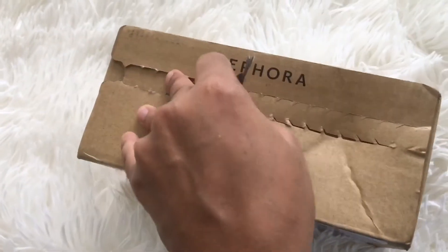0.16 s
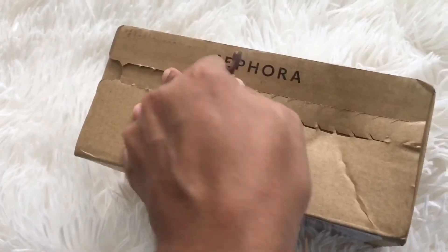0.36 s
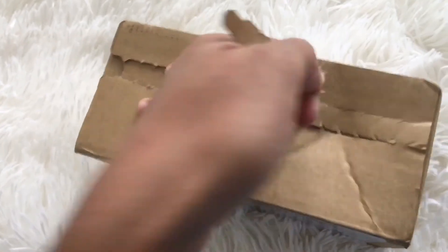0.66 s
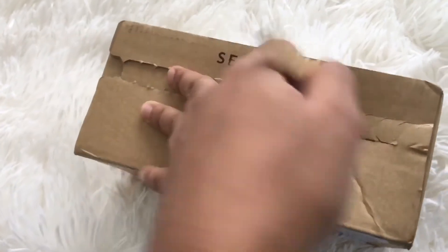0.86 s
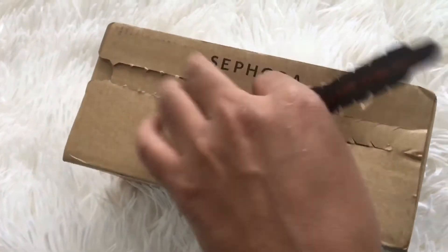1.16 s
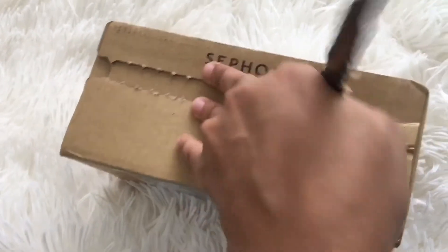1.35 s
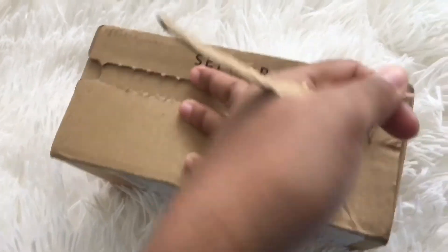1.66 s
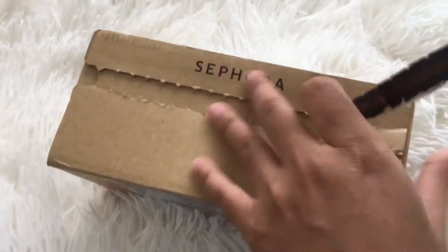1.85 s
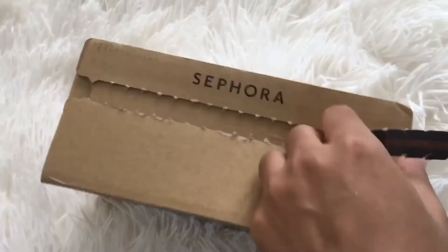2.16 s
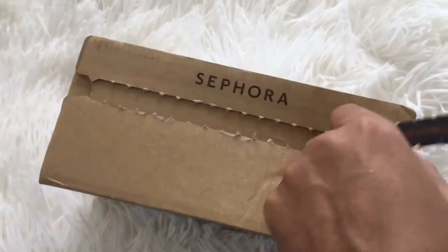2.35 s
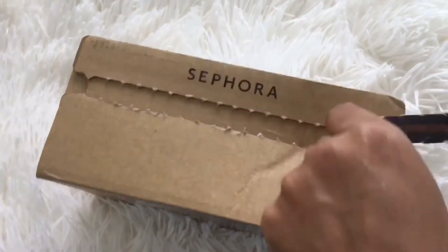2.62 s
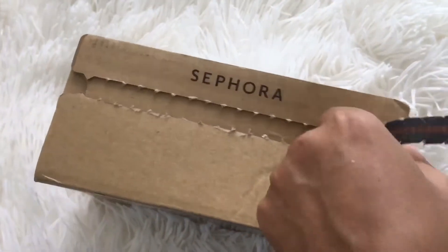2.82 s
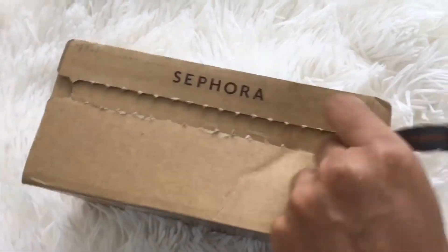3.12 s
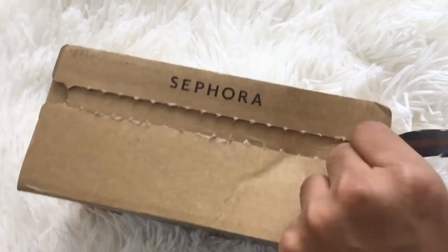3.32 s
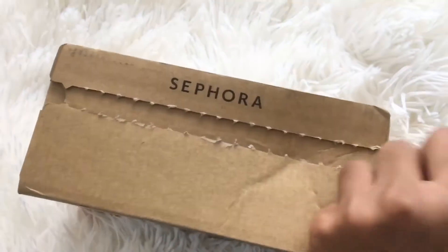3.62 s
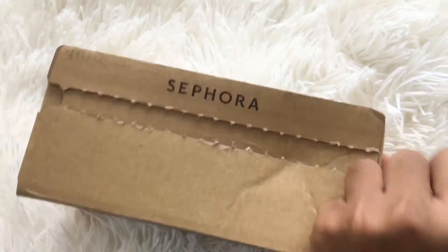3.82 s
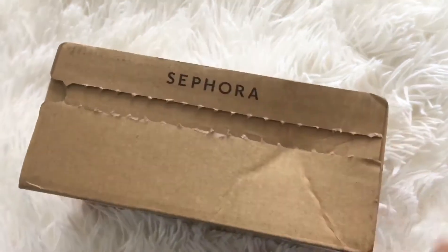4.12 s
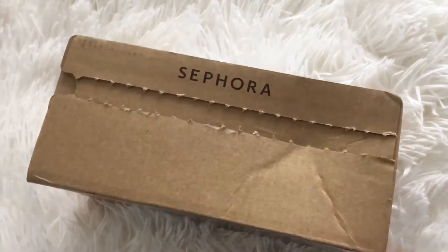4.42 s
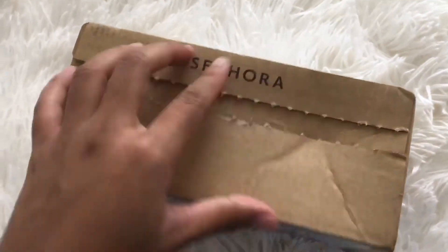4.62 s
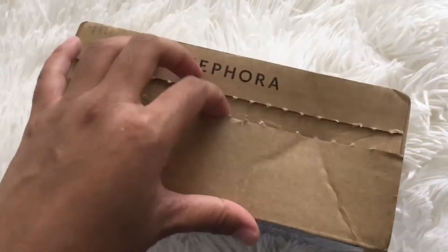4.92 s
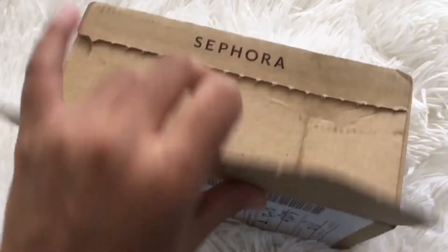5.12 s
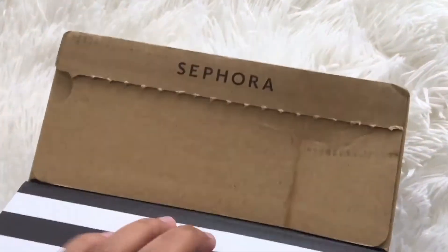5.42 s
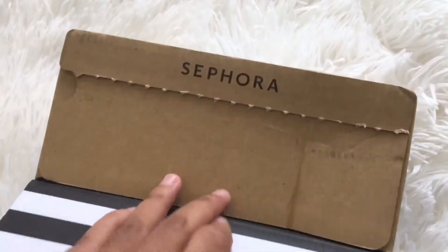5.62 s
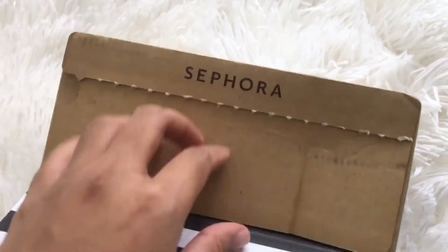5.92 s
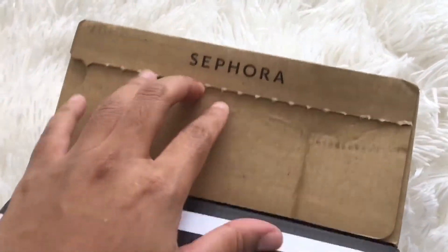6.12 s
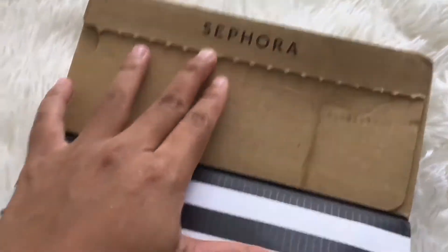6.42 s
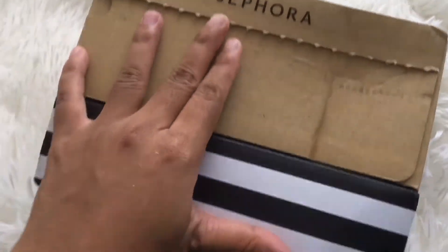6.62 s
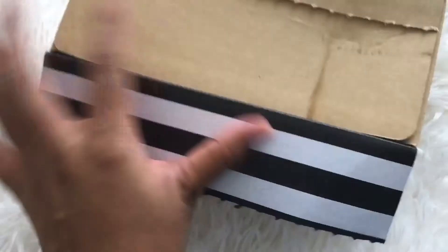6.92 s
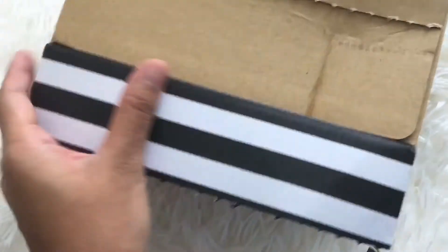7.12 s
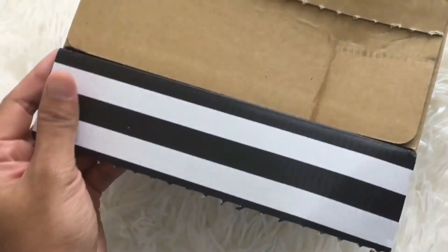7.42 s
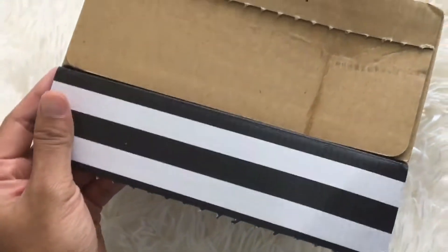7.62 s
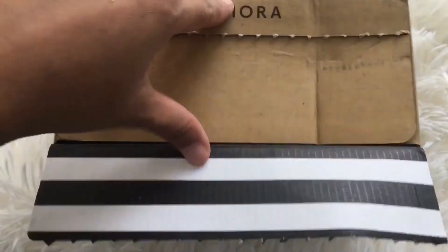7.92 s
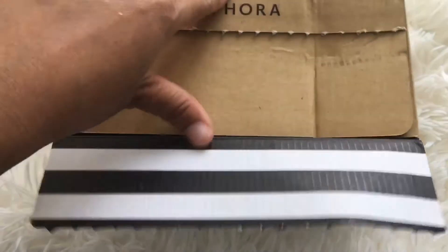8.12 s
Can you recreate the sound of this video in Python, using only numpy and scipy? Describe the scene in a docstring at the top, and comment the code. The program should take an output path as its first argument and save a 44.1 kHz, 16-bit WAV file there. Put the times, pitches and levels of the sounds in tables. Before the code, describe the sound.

A quiet furnished room with low air noise and a faint steady hum; a hollow corrugated box is very close to the microphone. Soft sawing rubs begin at 0.1 s, then from 0.27 to 0.57 s a loud, dense rip crackles with rapid boxy snaps and thumps, the loudest moment. Light brushes, ticks and a dull bump follow until 1.1 s. Sharp snaps tear at 1.2 to 1.46 s, then skin slides and taps softly. Short rasps resume at 2.4 s, with snapping tears near 2.8, 3.3 and 3.74 s. It nearly hushes from 4 to 4.5 s. The lid scrapes in dry chattering bursts from 4.65 to 5.1 s and 5.5 to 6.3 s, with small bumps. Airy, low palm sliding runs from 6.6 to 7.2 s, then faint handling. At 8.0 to 8.1 s the crease gives weak muffled cracks, followed by brief scrapes.

```python
"""In a quiet room with a faint appliance hum, hands shift on a corrugated cardboard box on a thick rug.
A knife saws through its glued flap, close by: rubbing is filtered random grains, ripping a dense crackle.
Fibres fray and snap: jolts of force ring panel resonances and thump the hollow box; bumps and ticks follow.
Then hands slide over the card and lift the lid, whose scraping edge chatters in bursts of ringing catches.
Folded back, the lid cracks at its crease, rung like the snaps but through its own resonances."""
import sys
import numpy as np
from scipy import signal
from scipy.fft import rfft, irfft, next_fast_len
from scipy.io import wavfile
from scipy.ndimage import uniform_filter1d

SR = 44100
rng = np.random.default_rng(int(sys.argv[2]) if len(sys.argv) > 2 else 0)


def to_wav(s):
    """Save 16-bit WAV."""
    ch = np.atleast_2d(s).T  # columns
    pcm = np.round(np.clip(ch, -1, 1) * 32767)  # PCM
    wavfile.write(sys.argv[1], SR, pcm.astype(np.int16))


N = 364266
TIME = np.arange(N) / SR   # s

# still air of the room: (frequency [Hz], relative level per Hz [dB])
AIR_SPECTRUM = [(22, -25), (32, -15.5), (45, 4), (65, 8), (90, -0.5), (130, -5.5), (185, -1.5), (280, -10),
                (500, -19.5), (1300, -23), (2500, -29.5), (5000, -55.5), (6800, -42), (16000, -65.5)]
AIR_DB = -52   # rms level
# humming lines of an appliance: (frequency [Hz], pitch waver [Hz], level [dB])
HUM_LINES = [(190, 5.6, -65.5), (368, 6, -75), (1853, 5.98, -72)]

# faint shifting of the holding hands, underneath everything: (time [s], relative rasp level [dB])
GRIP_LEVELS = [(0, -66), (0.9, -64), (2.1, -63.5), (2.35, -65), (3.1, -62), (3.65, -69.5), (3.95, -63),
               (4.35, -71.5), (4.6, -62), (5.2, -60.5), (6.45, -64), (7.55, -68.5), (7.7, -65),
               (8.25, -60.5)]
GRIP_DRONE_DB, GRIP_HISS_DB = 3, -4   # above the rasp
# colour of sliding friction: (frequency [Hz], relative level per Hz [dB])
FRICTION_SPECTRUM = [(130, 6), (220, -6.5), (330, 7), (540, 3), (690, 3), (900, -0.5), (1270, 0.5),
                     (1900, 0.5), (2600, -1.5), (3600, -10), (5000, -15), (6800, -12.5), (10500, -13.5),
                     (16000, -10)]
# the blade slides along the seam:
# (start time [s], length [s], relative rasp level [dB], brightness [dB])
BLADE_STROKES = [(0.12, 0.073, -58, -0.5), (0.185, 0.05, -54.5, 2), (0.3, 0.23, -50, 5),
                 (0.66, 0.063, -57.5, 5.5), (1.13, 0.18, -59.5, 11), (1.31, 0.18, -51, 4.5),
                 (2.435, 0.05, -57, 0), (2.55, 0.096, -61, -7), (2.77, 0.087, -50, -0.5),
                 (2.95, 0.053, -58, 1), (3.065, 0.045, -54.5, -1), (3.225, 0.055, -48, -1.5),
                 (3.29, 0.12, -52, -0.5), (3.485, 0.061, -54.5, 1.5), (3.695, 0.074, -49.5, -2),
                 (3.77, 0.15, -61, 0.5)]
# skin brushes over the card:
# (start time [s], length [s], relative rasp level [dB], brightness [dB])
SKIN_BRUSHES = [(0.735, 0.026, -57, 9), (0.825, 0.027, -67, 12), (0.955, 0.026, -52.5, -3),
                (1.6, 0.05, -57, 8), (1.67, 0.18, -57.5, 0.5), (1.96, 0.062, -63, -4.5),
                (2.955, 0.016, -58.5, 2), (3.09, 0.015, -54.5, 4.5), (4.03, 0.08, -67.5, 3.5),
                (5.325, 0.046, -58.5, 2.5), (5.395, 0.08, -51, 0), (5.96, 0.045, -57.5, 1),
                (6.205, 0.05, -64, 3), (6.615, 0.061, -54.5, -2.5), (6.70, 0.1, -52.5, -5),
                (6.76, 0.12, -58, 1.5), (6.91, 0.24, -54, -3.5), (7.06, 0.037, -50, -5.5),
                (7.16, 0.099, -65, 0), (7.84, 0.095, -59, 0)]
# the lid scrapes against the box:
# (start time [s], length [s], relative rasp level [dB], brightness [dB], chatter pitch [Hz])
LID_SCRAPES = [(4.647, 0.12, -57, 12, 1400), (4.765, 0.042, -44.5, -2, 1250),
               (4.824, 0.12, -53.5, 1.5, 1290), (4.896, 0.051, -54.5, 4, 1330),
               (5.015, 0.031, -48, -1, 1190), (5.073, 0.028, -59, 1, 3770), (5.51, 0.076, -47, 3.5, 3300),
               (5.673, 0.098, -51.5, 0, 1300), (5.74, 0.073, -48, 0.5, 1660),
               (5.825, 0.061, -47.5, 2, 2080), (6.057, 0.068, -51.5, 1, 2770), (6.14, 0.1, -56.5, -8, 480),
               (6.294, 0.054, -59, -8, 900), (8.133, 0.047, -56, 1.5, 1180),
               (8.23, 0.056, -53.5, 5.5, 2300)]
# a longer stroke gathers speed and dies away more slowly: shares of its length
STROKE_SWELL, STROKE_FADE = 0.14, 0.21

# runs of the blade ripping fibres:
# (start time [s], length [s], relative starting level [dB], rise over the run [dB])
RIP_RUNS = [(0.252, 0.065, -53.5, 8), (0.306, 0.016, -41.5, 14.5), (0.401, 0.039, -45.5, 23.5),
            (0.434, 0.015, -35.5, -12), (0.446, 0.036, -26.5, -10), (0.492, 0.018, -41, 10),
            (0.509, 0.023, -39.5, 5), (1.175, 0.055, -57.5, 7), (1.209, 0.018, -49, 14),
            (1.323, 0.023, -43.5, 18), (1.442, 0.039, -30.5, -20), (2.757, 0.026, -58.5, 28.5),
            (2.794, 0.016, -36, -3), (2.81, 0.05, -51.5, 0), (3.267, 0.011, -42, 6), (3.305, 0.014, -48, 9),
            (3.707, 0.045, -47, -9)]
RIP_BITE_S = 0.0051   # the blade takes this long to bite

# the glued flap snaps under the blade:
# (time [s], thump level [dB], panel pitch [Hz], knock level [dB], crack level [dB],
#  rebound strength [dB])
FLAP_SNAPS = [(0.266, -44, 390, -35, -43.5, -11), (0.3039, -27.5, 405, -40, -42, -15),
              (0.3252, -14, 354, -14, -23, -9.5), (0.3937, -44, 517, -41, -41.5, -14),
              (0.4069, -26.5, 530, -33, -42, -19.5), (0.4155, -35, 320, -29, -27, -16),
              (0.4301, -21, 293, -16.5, -24, 0.5), (0.439, -19.5, 437, -27.5, -29, -20),
              (0.455, -21.5, 426, -14, -24, -0.5), (0.5006, -20, 345, -16, -24, 2),
              (0.5284, -31.5, 430, -34.5, -39, -15), (0.547, -20.5, 484, -23.5, -19, -24),
              (0.565, -35.5, 510, -44.5, -34, -6.5), (1.214, -23, 334, -15, -22.5, -20),
              (1.2529, -23.5, 410, -26.5, -33, -23), (1.345, -33, 580, -26, -23, 6),
              (1.4353, -22.5, 490, -28, -21, -28.5), (1.4422, -28.5, 420, -30.5, -24, -30),
              (1.458, -28, 506, -27.5, -24, 0.5), (2.7865, -24.5, 307, -17, -22, -18),
              (2.7937, -16.5, 151, -30, -30, -6.5), (2.8039, -22, 460, -24.5, -33.5, -32),
              (2.8385, -44, 200, -41, -36.5, 0), (3.3245, -25, 210, -36, -32.5, -7),
              (3.3706, -21.5, 393, -22.5, -32.5, 1.5), (3.74, -25, 175.5, -35.5, -33.5, -9)]
SNAP_FRAY_MS, CREASE_FRAY_MS = 1.34, 2.9   # fibres fray before they break
# the freed panel swings back: a second jolt, lower in pitch, each part shifted by its own amount
REBOUND_S, REBOUND_PITCH = .0036, .8
REBOUND_THUMP_DB, REBOUND_KNOCK_DB, REBOUND_CRACK_DB = 0.5, -10, -6.5
# resonances of the box, from hollow to liner: (frequency [Hz], width [Hz], relative level [dB])
BOX_MODES = [(101, 29, 3), (171, 120, 1.5), (260, 34, -16.5), (371.6, 64, 2.5), (490, 79, 0.5),
             (630, 67, -2.5), (1194, 364, 4.5), (1545, 250, -10.5), (2263, 280, -13), (3240, 610, -12.5),
             (5470, 330, -13), (6440, 530, -16), (8520, 1400, -15), (11640, 470, -15), (15000, 8900, -23.5)]
SPOT_SPREAD_DB = 2.5   # how much the strength of a resonance differs from spot to spot
PANEL_Q = 2.5          # a flexing panel springs back for only a cycle or two
LEVEL_SPAN = np.sqrt(.005 * SR)   # levels of snaps, bumps and ticks are rms over 5 ms

# a torn edge catches and flicks free: (time [s], level [dB], ring pitch [Hz])
EDGE_TICKS = [(0.691, -51.5, 2350), (1.07, -60.5, 8260), (1.176, -53, 4350), (2.273, -64, 14000),
              (2.303, -56, 9000), (2.325, -53, 7450), (2.566, -57.5, 9100), (3.113, -71, 6140),
              (3.886, -58, 3970), (3.961, -49, 2250), (4.911, -46.5, 1450), (5.528, -49.5, 3470),
              (5.614, -44.5, 1570), (6.606, -48, 2270), (7.862, -51, 2250)]

# hand and knife handle bump the box:
# (time [s], thump level [dB], panel pitch [Hz], hardness: knock above thump [dB])
BOX_BUMPS = [(0.79, -43, 516, -17), (0.893, -33.5, 387, -9.5), (1.08, -46, 190, -11),
             (1.671, -40.5, 376, -13), (1.83, -38, 320, -8.5), (1.999, -38.5, 189, -8.5),
             (3.054, -42, 500, -9.5), (3.832, -40.5, 249, -10.5), (4.523, -43.5, 222, -8.5),
             (4.532, -41.5, 292, -8), (4.703, -32, 318, -7), (5.462, -36, 186, -19), (5.774, -54, 219, -7),
             (5.896, -37.5, 358, -7), (6.108, -43, 340, 0), (7.677, -44.5, 178, -10)]
BUMP_CRACK_DB, BUMP_CONTACT_MS = -7, 2   # crack above the knock; time a soft contact takes

# above the rasp; catches per second; sharpness of the ring
CHATTER_DB, CHATTER_PER_S, CHATTER_Q = -5, 700, 3.5

# the crease of the lid gives as it is folded back:
# (time [s], thump level [dB], panel pitch [Hz], knock level [dB], crack level [dB],
#  rebound strength [dB])
CREASE_CRACKS = [(8.0054, -39, 210, -34, -46, -11), (8.0165, -32.5, 222, -32, -46.5, -21),
                 (8.035, -32.5, 226, -37, -55, -16), (8.0875, -32.5, 312, -31, -45, 4.5)]
# resonances of the free-standing lid: (frequency [Hz], width [Hz], relative level [dB])
LID_MODES = [(222, 47, -7.5), (810, 66, -13.5), (1250, 126, 1), (1900, 270, -16), (2400, 320, -14),
             (3600, 430, -2.5), (4340, 700, -12), (5770, 600, -1), (8600, 730, -20)]

# the room's ring: (band centre [Hz], time to fall by 60 dB [s])
ROOM_DECAY = [(100, 0.55), (400, 0.16), (1200, 0.35), (3000, 0.29), (8000, 0.19), (16000, 0.13)]
# colour of the room's reflections: (frequency [Hz], relative level [dB])
ROOM_SPECTRUM = [(100, -16), (400, -12), (1200, -17.5), (3000, -18), (8000, -18.5), (16000, -12.5)]
CUTOFF_HZ = 15900


def from_db(db):
    """Turns dB into an amplitude factor."""
    return 10 ** (np.asarray(db) / 20)


def rms_one(x):
    """Scales a signal to rms 1."""
    return x / np.sqrt(np.mean(x ** 2) + 1e-20)


def unit_energy(rows):
    """Scales each row to energy 1."""
    return rows / (np.linalg.norm(rows, axis=-1, keepdims=True) + 1e-12)


def at_hz(points, hz):
    """Reads a table over log frequency."""
    known_hz, values = np.transpose(points)
    return np.interp(np.log(np.maximum(hz, 1)), np.log(known_hz), values)


def coloured(x, spectrum):
    """Filters a signal with a spectrum; rms 1."""
    size = next_fast_len(N)
    gain = from_db(at_hz(spectrum, np.fft.rfftfreq(size, 1 / SR)))
    return rms_one(irfft(rfft(x, size) * gain, size)[:N])


def add(out, sound, start):
    """Mixes a sound in from a sample on."""
    part = out[start:start + len(sound)]
    part += sound[:len(part)]


def drift(rate):
    """Smooth chance with rate turning points per second; rms 1."""
    steps = TIME * rate
    return rms_one(np.interp(steps, np.arange(N // 10), rng.standard_normal(N // 10)))


def butter(x, order, edge_hz, kind="low"):
    """Butterworth filter."""
    return signal.sosfilt(signal.butter(order, edge_hz, kind, fs=SR, output="sos"), x)


def resonance(x, hz, width_hz):
    """Two-pole band-pass: a ringing mode with a gain near 1 at its peak."""
    r = np.exp(-np.pi * width_hz / SR)
    top = np.array([1, 0, -1]) * (1 - r * r) / 2
    return signal.lfilter(top, [1, -2 * r * np.cos(2 * np.pi * hz / SR), r * r], x + 1e-18)


def rung(force, body):
    """Each row of force meets the body at another spot, so it drives the modes with its own strengths."""
    spots = SPOT_SPREAD_DB * rng.standard_normal((len(force), len(body)))
    return sum(resonance(force, hz, width) * from_db(db + spots[:, [k]])
               for k, (hz, width, db) in enumerate(body))


def three_ranges(x, low_hz, high_hz):
    """Bass, middle and treble of a signal."""
    cuts = [(low_hz, "low"), ([low_hz, high_hz], "band"), (high_hz, "high")]
    return [butter(x, 3, edge, kind) for edge, kind in cuts]


def tilted(x, pivot_hz, upper_db):
    """Shifts the weight of a sound above or below a pitch; the level stays about the same."""
    low, high = [rms_one(butter(x, 1, pivot_hz, kind)) for kind in ("low", "high")]
    gain = from_db(upper_db)
    return (low + gain * high) / np.hypot(1, gain)


def grains(per_s, spread_db, shape):
    """Fibres breaking at random: sparse clicks of uneven size and random sign; rms 1."""
    sizes = from_db(spread_db * np.minimum(rng.exponential(1, shape), 4))
    sizes = sizes * rng.choice([-1, 1], shape)
    return rms_one(sizes * (rng.random(shape) < per_s / SR))


def background(waver_per_s=40):
    """Low room noise with the steady, slightly wavering lines of an appliance."""
    hum = 0
    for hz, waver_hz, db in HUM_LINES:
        cycles = np.cumsum(hz + waver_hz * drift(waver_per_s)) / SR
        hum = hum + from_db(db) * rms_one(np.sin(2 * np.pi * cycles))
    return from_db(AIR_DB) * coloured(rng.standard_normal(N), AIR_SPECTRUM) + hum


def rubbing(catch_db=0.6, flutter_db=2.3, patchy_db=2.0, grit_db=-4,
            rasp_lean_db=0, hiss_lean_db=-3, airy_share=.9, count=26):
    """Countless tiny slips of rough card; the travelling contact drives now these, now those resonances."""
    forces = grains(per_s=22000, spread_db=1.5, shape=(2, N))
    slips = 0
    for k, hz in enumerate(np.geomspace(170, 15000, count)):
        patch = from_db(patchy_db * drift(rate=22))
        slips = slips + (-1) ** (k // 2) * resonance(forces[k % 2], hz, hz / 7) * patch
    # ridges and torn edges flick past
    grit = rms_one(rung(grains(per_s=210, spread_db=0.5, shape=(1, N)), BOX_MODES)[0])
    contact = coloured(slips, FRICTION_SPECTRUM) + from_db(grit_db) * grit
    drone, rasp, hiss = three_ranges(contact, low_hz=1050, high_hz=3740)
    drone_db, rasp_db, hiss_db = sliding_levels()
    # a light brush of skin is airy throughout; card pressed on card leans lower
    airy_db = airy_share * np.clip(hiss_db - rasp_db, -12, 12)
    rasp = tilted(rasp, pivot_hz=2120, upper_db=rasp_lean_db + airy_db)
    hiss = tilted(hiss, pivot_hz=8500, upper_db=hiss_lean_db + airy_db)
    catch = catch_db * drift(rate=320)  # the contact catches and frees
    return sum(rms_one(part) * from_db(level + catch + flutter_db * drift(rate=45))
               for part, level in [(drone, drone_db), (rasp, rasp_db), (hiss, hiss_db)])


def sliding_levels():
    """Relative levels in dB of panel drone, rasp and hiss: the powers of all that slides add up."""
    blade = strokes(BLADE_STROKES, attack_s=0.0087, release_s=0.011,
                    drone_db=2.5, hiss_db=-4, drone_share=0.4, hiss_share=0.98)
    skin = strokes(SKIN_BRUSHES, attack_s=0.017, release_s=0.013,
                   drone_db=-5.5, hiss_db=2.5, drone_share=0.33, hiss_share=0.98)
    lid = strokes(LID_SCRAPES, attack_s=0.013, release_s=0.0047,
                  drone_db=1.8, hiss_db=-6.0, drone_share=0.98, hiss_share=.1)
    grip_db = np.interp(TIME, *np.transpose(GRIP_LEVELS))
    hold = from_db([grip_db + GRIP_DRONE_DB, grip_db, grip_db + GRIP_HISS_DB]) ** 2
    return 10 * np.log10(blade + skin + lid + hold)


def strokes(rows, attack_s, release_s, drone_db, hiss_db, drone_share, hiss_share):
    """Power of drone, rasp and hiss; a brighter stroke has more hiss and less drone."""
    power = np.zeros((3, N))
    for start, length, db, bright_db, *_ in rows:
        speed = stroke_speed(length, attack_s, release_s)
        levels = [db + drone_db - drone_share * bright_db, db, db + hiss_db + hiss_share * bright_db]
        for part, level in zip(power, levels):
            add(part, (from_db(level) * speed) ** 2, round(start * SR))
    return power


def stroke_speed(length, attack_s, release_s):
    """A stroke gathers speed, holds, and dies away exponentially after its length."""
    t = TIME[:SR]
    rise_s, fall_s = attack_s + STROKE_SWELL * length, release_s + STROKE_FADE * length
    return np.minimum(t / rise_s, 1) * np.exp(-np.maximum(t - length, 0) / fall_s)


def rips(bright_db=-11, tug_db=1.8):
    """The blade tugs unevenly through the liner: a dense crackle, through the panels and straight."""
    pull = 0
    for start, length, db, rise_db in RIP_RUNS:
        bite = np.clip((TIME - start) / RIP_BITE_S, 0, 1) * (TIME < start + length)
        pull = pull + bite * from_db(db + rise_db * np.clip((TIME - start) / length, 0, 1))
    fibres = grains(per_s=2000, spread_db=1.5, shape=(1, N))
    fibres = fibres * rms_one(from_db(tug_db * drift(rate=450)))
    crackle = rms_one(rung(fibres, BOX_MODES)[0]) + from_db(bright_db) * fibres[0]
    return uniform_filter1d(pull, size=60) * crackle


def snaps(breaks, body, panel_q, whole_body_db, fray_share=0.79, settle_ms=1.52, size=4096):
    """Fraying swells up to the break, whose one jolt runs through the card and rings the body."""
    when, thump_db, panel_hz, knock_db, crack_db, fray_ms = np.array(breaks).T[:, :, None]
    lead = size // 4   # samples of fraying ahead of the break
    ms = (np.arange(size) - lead) * 1000 / SR
    fray_ms = np.maximum(fray_ms, .1)
    swell = np.exp(-np.abs(ms) / np.where(ms < 0, fray_ms, settle_ms * np.sqrt(fray_ms)))
    fray = unit_energy(grains(per_s=8000, spread_db=3.5, shape=swell.shape) * swell)
    force = fray_share * fray_ms * fray
    force[:, lead] += 1
    force = bend(force, travel_ms=0.753)
    hollow, knock, crack = three_ranges(rung(force, body), low_hz=706, high_hz=2530)
    # the nearest panel springs back for a few cycles at most, while the hollow body booms on
    flex = np.array([resonance(row, hz, hz / panel_q) for row, hz in zip(force, panel_hz[:, 0])])
    flex = butter(flex, 3, 650)
    thump = unit_energy(flex) + from_db(whole_body_db) * unit_energy(hollow)
    sounds = sum(LEVEL_SPAN * from_db(db) * unit_energy(part)
                 for part, db in [(thump, thump_db), (knock, knock_db), (crack, crack_db)])
    out = np.zeros(N)
    for s, sound in zip(when[:, 0], sounds):
        add(out, sound, round(s * SR) - lead)
    return out


def bend(x, travel_ms):
    """Bending waves in card are dispersive: lower pitches arrive later, so a click becomes a falling chirp."""
    hz = np.fft.rfftfreq(x.shape[-1], 1 / SR)
    # travel_ms is the full delay at 1 kHz; the delay at 10 kHz is taken off all pitches
    cycles = travel_ms * (2 * np.sqrt(hz / 1000) - hz / 1000 / np.sqrt(10))
    return irfft(rfft(x) * np.exp(-2j * np.pi * cycles))


def with_rebound(rows, fray_ms):
    """Each break is followed by the jolt of the panel swinging back."""
    breaks = []
    for s, thump_db, hz, knock_db, crack_db, rebound_db in rows:
        breaks.append((s, thump_db, hz, knock_db, crack_db, fray_ms))
        breaks.append((s + REBOUND_S, thump_db + rebound_db + REBOUND_THUMP_DB, hz * REBOUND_PITCH,
                       knock_db + rebound_db + REBOUND_KNOCK_DB,
                       crack_db + rebound_db + REBOUND_CRACK_DB, fray_ms))
    return breaks


def ticks(edge_q=3.3, die_s=0.0014, direct_db=-14, size=2048):
    """A small stiff edge lets go with a click and a short noise burst, and rings briefly at its own pitch."""
    out, fade = np.zeros(N), np.exp(-TIME[:size] / die_s)
    for s, db, hz in EDGE_TICKS:
        force = unit_energy(rng.standard_normal(size) * fade)
        force[0] += 1
        ring = unit_energy(resonance(force, hz, hz / edge_q))
        sound = ring + from_db(direct_db) * unit_energy(force)
        add(out, LEVEL_SPAN * from_db(db) * sound, round(s * SR))
    return out


def bumps():
    """Soft blows on the box: mostly thump; the harder the contact, the more knock and crack."""
    blows = [(s, db, hz, db + hard_db, db + hard_db + BUMP_CRACK_DB, BUMP_CONTACT_MS)
             for s, db, hz, hard_db in BOX_BUMPS]
    return snaps(blows, BOX_MODES, PANEL_Q, whole_body_db=-8.5)


def chatter():
    """The lid's ridged edge catches again and again as it scrapes, ringing at a pitch set by where it touches."""
    out = np.zeros(N)
    for start, length, db, _, hz in LID_SCRAPES:
        catches = grains(per_s=CHATTER_PER_S, spread_db=3.0, shape=SR)
        speed = stroke_speed(length, attack_s=0.016, release_s=0.0054)
        ring = rms_one(resonance(catches, hz, hz / CHATTER_Q))
        add(out, from_db(db + CHATTER_DB) * speed * ring, round(start * SR))
    return out


def room(x, gap_s=0.007, build_s=0.0023, size=32768):
    """Diffuse reflections of a furnished room: noise tails that decay at a rate of their own in each band."""
    t = np.maximum(TIME[:size] - gap_s, 0)
    hz = np.fft.rfftfreq(size, 1 / SR)
    white, tail = rfft(rng.standard_normal(size)), 0
    for centre_hz, t60 in ROOM_DECAY:
        share = at_hz([(f, float(f == centre_hz)) for f, _ in ROOM_DECAY], hz)
        fade = from_db(-60 * t / t60) * (1 - np.exp(-t / build_s))
        band = irfft(white * share * from_db(at_hz(ROOM_SPECTRUM, hz)))
        tail = tail + band * unit_energy(fade)
    return signal.fftconvolve(x, tail)[:N]


def scene(rip_db=-2.0, rub_db=-2.5):
    """The box close by, the room behind it."""
    flap = snaps(with_rebound(FLAP_SNAPS, SNAP_FRAY_MS), BOX_MODES, PANEL_Q, whole_body_db=-3)
    crease = snaps(with_rebound(CREASE_CRACKS, CREASE_FRAY_MS), LID_MODES, panel_q=4.8, whole_body_db=-1.5)
    card = flap + crease + bumps() + ticks() + chatter()
    card = card + from_db(rip_db) * rips() + from_db(rub_db) * rubbing()
    return (card + room(card) + background())[None]


def record(dry):
    """The microphone sheds the deepest bass, the highest peaks are rounded and the top is cut."""
    heard = butter(dry, 3, 35, "high")
    rounded = 1.3 * np.tanh(heard / 1.3)
    return signal.sosfilt(signal.ellip(10, .1, 70, CUTOFF_HZ, fs=SR, output="sos"), rounded)


dry = scene()
out = record(dry)
to_wav(out)
```